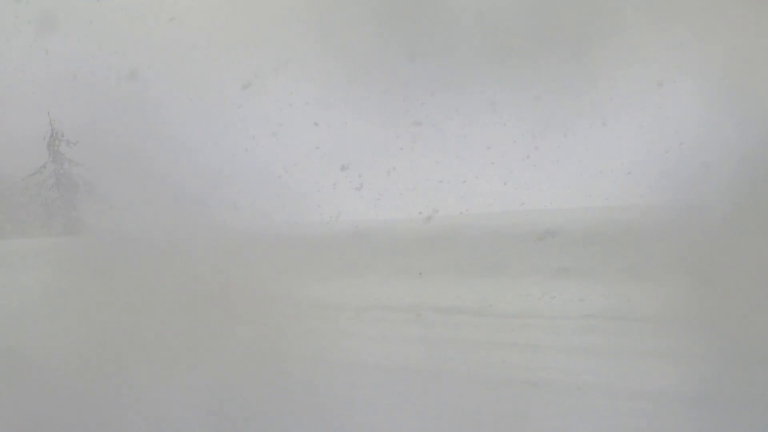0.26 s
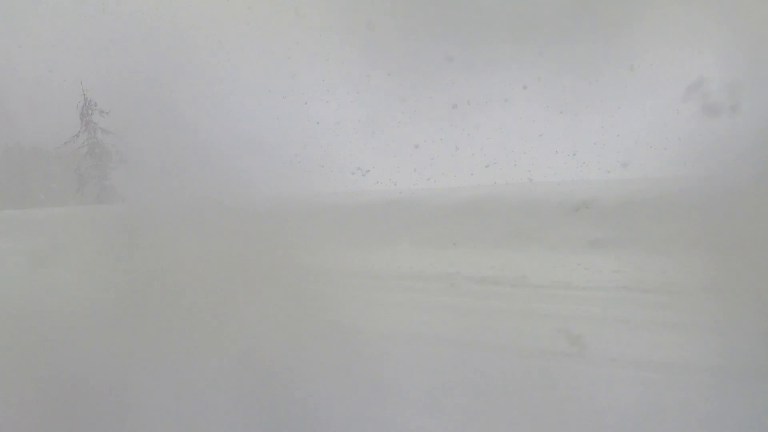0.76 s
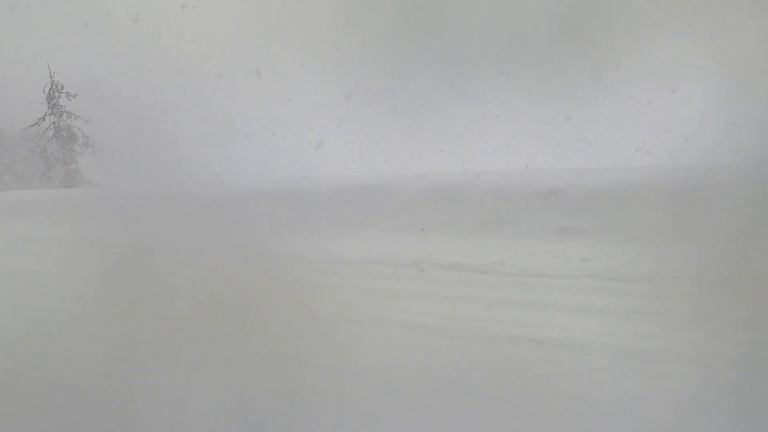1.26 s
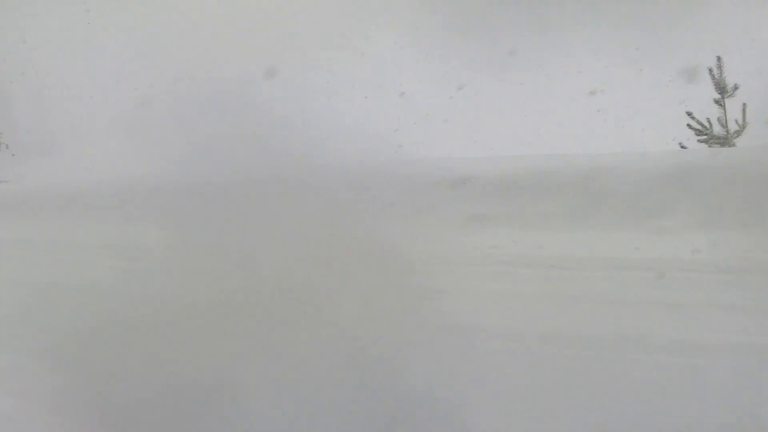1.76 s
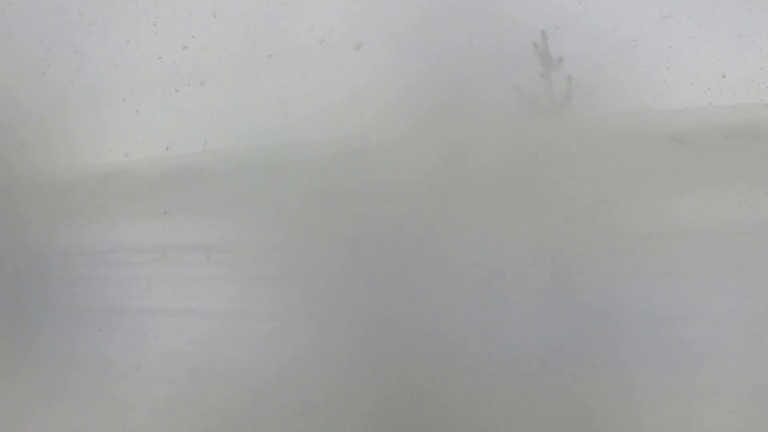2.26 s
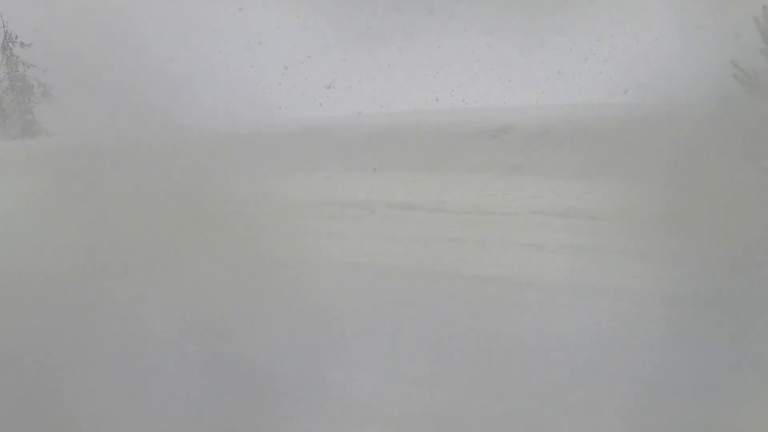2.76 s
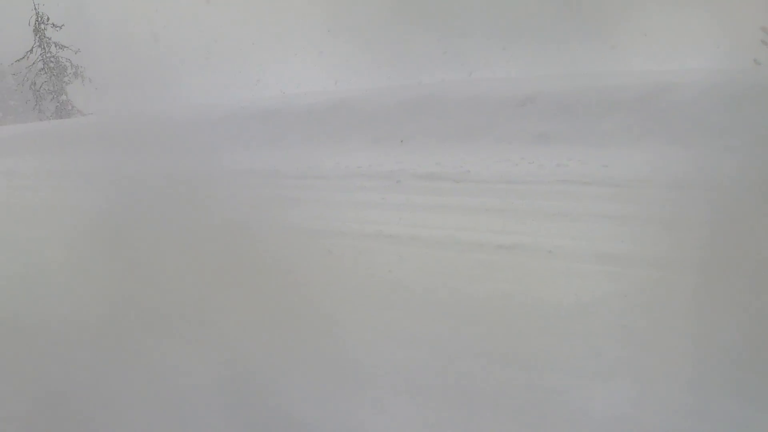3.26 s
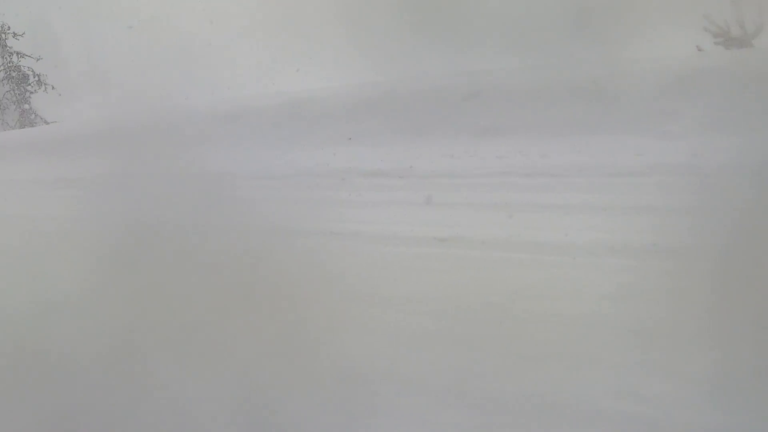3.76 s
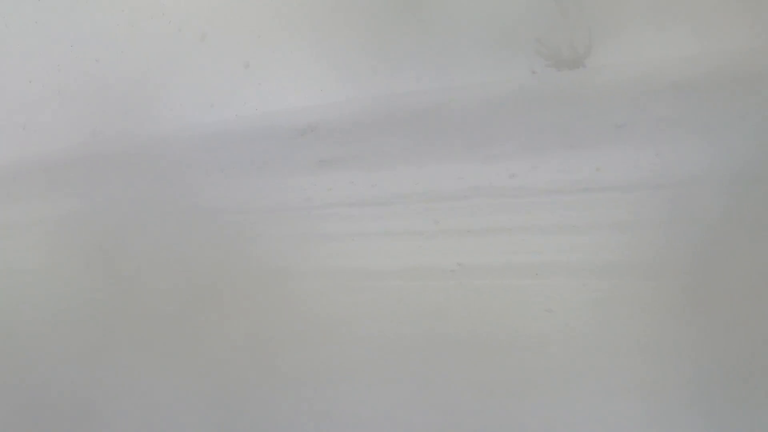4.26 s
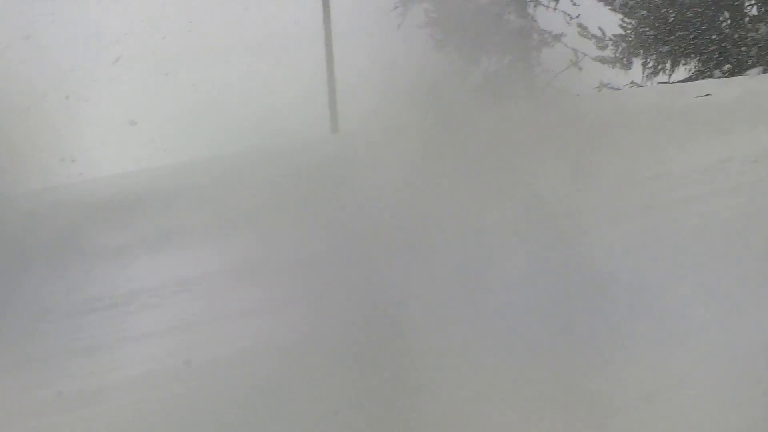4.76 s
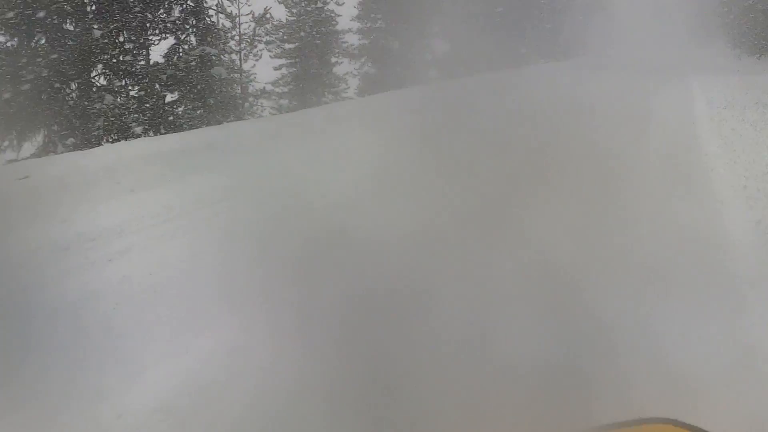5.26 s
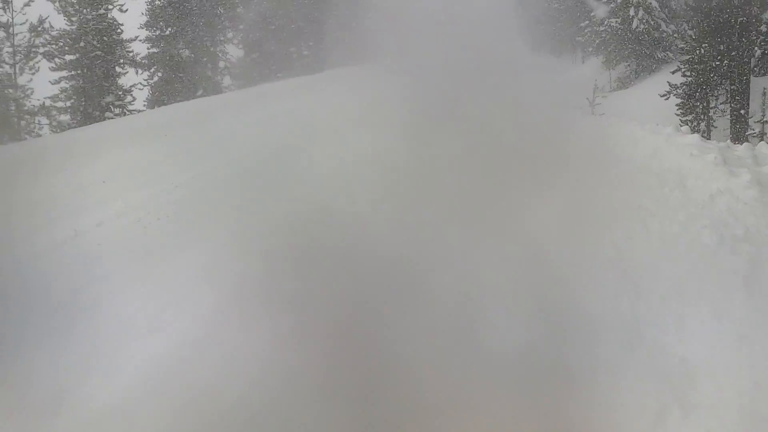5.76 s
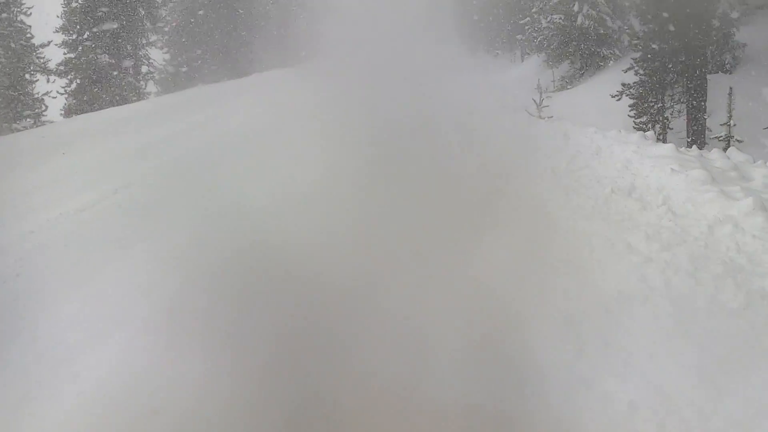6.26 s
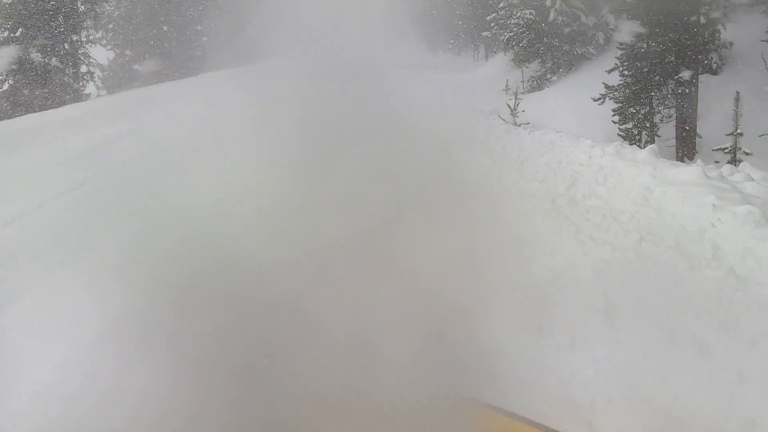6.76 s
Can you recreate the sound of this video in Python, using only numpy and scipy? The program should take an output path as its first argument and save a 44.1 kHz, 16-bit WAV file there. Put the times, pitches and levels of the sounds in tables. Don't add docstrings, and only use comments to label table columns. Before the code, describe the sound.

A lumpy low engine idle thumps close by while a distant sled hums and whistles. At about two seconds the near engine revs, stumbles with bright crackles, then gains speed in steps, belt whining and track rushing through snow. The far drone is covered. A heavy wind buffet strikes at the end; treble leans left because snow covers the right microphone.

```python
import sys
import numpy as np
from scipy import signal
from scipy.fft import rfft, irfft
from scipy.io import wavfile
from scipy.ndimage import uniform_filter1d, map_coordinates

SR = 44100
rng = np.random.default_rng(int(sys.argv[2]) if len(sys.argv) > 2 else 0)


def voltage_ratio(level):
    return 10 ** (np.asarray(level, float) / 20)


def wav_out(sig):
    wavfile.write(sys.argv[1], SR, np.round(np.clip(np.atleast_2d(sig).T, -1, 1) * 32767).astype(np.int16))


N = 308700


def evened(x):
    return x / np.sqrt(np.mean(x ** 2) + 1e-20)


def read(points, hz):
    point_hz, value = np.transpose(points)
    return np.interp(np.log(hz + 1), np.log(point_hz + 1), value)


def play(rows, t):
    start_s, *columns = np.transpose(rows)
    return [np.interp(t, start_s, column) for column in columns]


def drift(hz):
    knots = rng.standard_normal(2000)
    return evened(map_coordinates(knots, [np.arange(N) * hz / SR], order=3))


def level(rest_db, gain_db, control):
    return rest_db + gain_db * control


# pitch_hz, width_hz, lift_db
HOOD = [(294.6, 22, 13), (454, 15, 3.5), (700, 76, -4.5), (960, 11, 6.5), (1136, 50, 6), (1443, 13, 7.5),
        (1522, 25, 4), (1603, 17, 10), (3140, 210, 7.5)]


def hood_db(hz):
    return sum(lift_db / (1 + ((hz - f) / width_hz) ** 2) for f, width_hz, lift_db in HOOD)


def noise(spectrum, level_db, lift=0.0, patchy_db=1.5):
    frames, hz = N // 256 + 5, np.fft.rfftfreq(1024, 1 / SR)[:, None]
    a, b, c, d, patches = rng.standard_normal((frames, 513, 5), dtype=np.float32).T
    patches = evened(uniform_filter1d(uniform_filter1d(patches, 10, 0), 16, 1))
    colour_db = read(spectrum, hz) + lift * hood_db(hz) + patchy_db * patches
    z = np.array([a + 1j * b, c + 1j * d]) * voltage_ratio(colour_db)
    x = signal.istft(z, nperseg=1024, noverlap=768)[1][:, :N]
    return voltage_ratio(level_db) * evened(x)


# pitch_hz, likeness_0_1
PORT_LIKENESS = [(60, .7), (120, .99), (250, .85), (500, .9), (1010, .75), (2030, .8), (4120, .55),
                 (8330, .5)]
# pitch_hz, left_over_right_db
PORT_SHADOW = [(60, 2.7), (100, 2), (180, 1.8), (310, 4.5), (540, 10), (930, 15.5), (1610, 17), (2780, 14),
               (4810, 17.5), (8330, 32)]
# pitch_hz, left_lead_rad
PORT_LEAD = [(0, 0), (800, -.3), (1640, -.8), (2240, -1.3), (3360, -1.2), (3880, -.9), (5000, 1.2),
             (7150, 1.3)]


def ports(shared, own, shadow, lag_s):
    pad = 3150
    shared, own = np.pad(shared, pad, "reflect"), np.pad(own, ((0, 0), (pad, pad)), "reflect")
    hz = np.fft.rfftfreq(len(shared), 1 / SR)
    same = np.clip(read(PORT_LIKENESS, hz), -1, 1)
    tilt_db = shadow * read(PORT_SHADOW, hz)
    lead_rad = read(PORT_LEAD, hz)
    right = rfft(shared) + same * np.exp(-1j * lead_rad) * rfft(own[0])
    right = right + np.sqrt(1 - same ** 2) * rfft(own[1])
    left = rfft(shared + own[0]) * np.exp(-2j * np.pi * hz * lag_s)
    left_gain = 2 / np.sqrt(1 + voltage_ratio(-2 * tilt_db) + 2 * same * np.cos(lead_rad) * voltage_ratio(-tilt_db))
    return irfft(left_gain * np.array([left, right * voltage_ratio(-tilt_db)]), len(shared))[:, pad:-pad]


# pitch_hz, level_db_per_hz
WIND = [(12, -0.5), (30, -2), (60, -8), (120, -3.5), (300, -31), (1000, -69), (3000, -130)]


def wind(t, speed):
    gust_s, gust_rise_s, gust_db = 6.29, 0.14, 14.5
    gust = gust_db / (1 + np.exp((gust_s - t) / gust_rise_s))
    return noise(WIND, level(-34.5, -2.5, speed) + gust, patchy_db=2.5)


# pitch_hz, level_db_per_hz
AIR = [(7000, -30), (9000, -1.5), (12000, -4), (15500, -11)]


def air(churn_db):
    return noise(AIR, 0.36 * churn_db - 63.5, patchy_db=-3.5) * voltage_ratio([[3.5], [-3.5]])


# start_s, level_db
FAR = [(0, -51.5), (.7, -51.5), (1, -48.5), (2, -48.5), (3, -49), (4.5, -49.5), (7, -58)]
# multiples of its firing rate, then level_db of each
FAR_MULTIPLES = [1, 2, 4, 5, 7, 8, 8.5, 9, 10, 12, 17.3, 18, 30]
FAR_MULTIPLE_DB = [19, 3.5, 1, -5, -18, -0.5, -5, -6.5, -4, -13, -11, -10, -22.5]


def far_engine(t):
    rate_hz, sag_hz_per_s, settle_hz, settle_s = 131.8, 1.12, 5.2, .55
    turns = np.cumsum(rate_hz - sag_hz_per_s * t + settle_hz * np.exp(-t / settle_s)) / SR
    out = np.zeros(N)
    for multiple, db in zip(FAR_MULTIPLES, FAR_MULTIPLE_DB):
        waver = voltage_ratio(db + 3 + 1.8 * drift(9))
        out += waver * np.cos(2 * np.pi * multiple * turns + .45 * drift(7))
    return voltage_ratio(play(FAR, t)[0]) * out


def far_fan(t, speed):
    fan_hz, sag_hz_per_s = 1539, 6
    turns = np.cumsum(fan_hz - sag_hz_per_s * t) / SR
    level_db = play(FAR, t)[0] + level(2, -4, speed) + 1.8 * drift(9)
    return voltage_ratio(level_db) * np.cos(2 * np.pi * turns + .7 * drift(12))


# pitch_hz, level_db_per_hz
ROAR = [(120, -23), (200, 3), (227, -12.5), (316, -9), (434, -8), (525, -16), (858, -25), (1040, -19),
        (1420, -14.5), (1540, -18.5), (1800, -19.5), (2320, -17), (3620, -36.5), (7380, -35.5),
        (8780, -49.5), (11400, -80), (19300, -120)]


def far_sled(t, speed):
    roar = noise(ROAR, play(FAR, t)[0] + level(10, -1.5, speed), lift=0.64)
    return ports(far_engine(t) + far_fan(t, speed), roar, 1.1, 0.0001)


# start_s, firings, first_burnt_share_0_1
MISSES = [(1.858, 2, .3), (1.958, 1, .5), (2.907, 2, .4), (2.978, 2, .35), (3.025, 2, .15), (3.071, 1, .4),
          (3.118, 1, 0), (3.164, 1, .1), (3.232, 1, .3), (3.277, 1, 0), (3.321, 2, 0), (3.388, 1, .6),
          (3.432, 1, 0), (4.54, 2, 0), (4.883, 1, .6), (4.923, 1, .5), (4.974, 2, 0), (5.004, 2, 0),
          (5.064, 1, .4), (5.084, 2, 0), (5.203, 1, .5)]
# pitch_hz, level_db_per_hz
POP = [(1500, -20.5), (3000, 2), (5500, 2), (7600, -7.5), (8800, -31)]


def pops(throttle):
    t60_s = .07
    hits, t = np.zeros(N), np.arange(4000) / SR
    for start_s, count, share in MISSES:
        hits[round((start_s + .011 * count - .008) * SR)] = (count - 1 + .3) * (1 - share)
    return signal.oaconvolve(hits, voltage_ratio(-60 * t / t60_s))[:N] * noise(POP, level(-67, 24, throttle))


# pitch_hz, level_db_per_hz
CHURN = [(210, -30), (350, 0.5), (390, -1), (465, 1), (524, -13), (678, 1), (852, -13), (975, 2),
         (1040, -3), (2070, -14.5), (3960, -20), (7570, -36), (8780, -45.5), (11400, -83.5), (19300, -120)]


def track(throb, burn, churn_db, throttle):
    spit = 1 + 0.17 * np.maximum(.85 - burn, 0)
    churn = throb * spit * noise(CHURN, churn_db, lift=0.63)
    return ports(np.zeros(N), churn + pops(throttle), 0.99, 1e-5)


# start_s, firings_hz
REVS = [(0, 62), (.5, 55.2), (.9, 54), (1.25, 50.8), (1.55, 51.6), (2, 61.6), (2.45, 92), (3, 84.8),
        (3.4, 91), (3.65, 90.8), (4.6, 98.8), (5.05, 99.2), (5.25, 103.3), (5.5, 118.2), (5.8, 115.2),
        (6.15, 125), (6.5, 132.8), (7, 148)]


def crank(t):
    return np.cumsum(play(REVS, t)[0]) / SR + .35


def thump(hz):
    ring_hz, ring_t60_s = 128.0, .09
    t = np.arange(-800, 2400) / SR
    u, late_s = (np.pi * hz * t) ** 2, np.maximum(t - .006, 0)
    ring = np.sin(2 * np.pi * ring_hz * late_s) * voltage_ratio(-60 * late_s / ring_t60_s)
    return (2 * u - 1) * np.exp(-u) + .2 * ring


# start_s, firings
LATE = [(.002, 1), (.067, 2), (.134, 1), (.184, 2), (.269, 1), (.303, 1), (.338, 2), (.408, 2), (.514, 2),
        (.569, 2), (.64, 4), (.749, 2), (.823, 3), (.916, 1), (.972, 2), (1.049, 2), (1.145, 2), (1.242, 2),
        (1.32, 2), (1.436, 2), (1.533, 1), (1.649, 1), (1.704, 1), (1.862, 2), (1.963, 1)]


def exhaust(turns):
    at = np.flatnonzero(np.diff(np.floor(turns)))
    count_all = len(at)
    size = 1 + .07 * (-1.) ** np.arange(count_all) + .09 * rng.standard_normal(count_all)
    train, slump, chance = np.zeros(N), np.zeros(N), rng.standard_normal((count_all, 2))
    for start_s, count, share in MISSES:
        k = np.argmin(abs(at - start_s * SR))
        size[k:k + count] = (share, .42 - share)[:count]
        slump[at[k]] = 0.32 * (1 - share) ** 2
        size[k + count] *= 1.2
    for start_s, count in LATE:
        k = np.argmin(abs(at - (start_s - .0075) * SR)) + np.arange(count)
        share = np.where(k == k[0], 0.44, 0.58) + .15 * chance[k, 0]
        size[k] *= np.maximum(1 - 0.62 * share, 0)
        delay = (.43 + .04 * chance[k, 1]) * (at[k + 1] - at[k])
        train[at[k] + np.round(delay).astype(int)] = 1.86 * share
    train[at] = size
    hot = np.clip((np.gradient(turns) * SR - 108.0) / 48.0, 0, 1)
    low = signal.oaconvolve(train * (1 - hot), thump(80.0)) + signal.oaconvolve(train * hot, thump(129.7))
    slump_s = 0.0049
    u = np.arange(-800, 2400) / SR / slump_s - .4
    low = (low - signal.oaconvolve(slump, u * np.exp(-u ** 2)))[800:N + 800]
    power = uniform_filter1d(uniform_filter1d(low ** 2, 9000), 9000)
    return low / np.sqrt(abs(power)), train


# firings_hz, level_db
THUMP = [(52, -16.5), (62, -16.5), (80, -15), (95, -14), (128, -13.5), (138, -15.5), (148, -17.5)]
# pitch_hz, level_db
PIPE = [(110, -31.5), (170, -7.5), (205, -24), (280, 0.5), (345, -7), (420, -23.5), (465, 6), (520, -9)]
# pitch_hz, level_db
BELT = [(520, -69.5), (700, -41.5), (830, -55.5), (960, -35.5), (1120, -37.5), (1280, -36.5), (1400, -48)]
# multiples of the firing rate, then level_db of each
BUZZ_ORDERS = [2.5, 3.5, 5, 5.5, 6, 7, 7.5, 8, 8.5, 10.5, 11, 12]
BUZZ_ORDER_DB = [-4.5, 4, 4.5, -2, 4.5, 4.5, -1, -5, 3.5, 1.5, -5.5, 0.5]


def engine(turns, throttle):
    hz = np.gradient(turns) * SR
    low, train = exhaust(turns)
    burn = np.minimum(uniform_filter1d(train, 600) * SR / hz, 1.2)
    burn = uniform_filter1d(uniform_filter1d(burn, 300), 300)
    shaft_db, buzz_db = level(-51, 27, throttle), level(-61, 17, throttle)
    belt_order = 9.55
    # order, level_db, waver
    tones = [(k, db + read(PIPE, k * hz), .25) for k, db in ((2, -23.5), (3, -31.5), (4, -37.5))]
    tones += [(.5, shaft_db, .5), (1.5, shaft_db - 3.0, .5)]
    tones += [(belt_order, read(BELT, belt_order * hz), .3)]
    tones += [(k, buzz_db + db + hood_db(k * hz), .35) for k, db in zip(BUZZ_ORDERS, BUZZ_ORDER_DB)]
    out = np.zeros(N)
    for order, db, waver in tones:
        phase = 2 * np.pi * order * turns + 1.6 * waver * drift(8)
        out -= voltage_ratio(db + 3 + 6 * waver * drift(14)) * np.cos(phase)
    return voltage_ratio(read(THUMP, hz)) * low + burn * out, burn


# pitch_hz, level_db_per_hz
GROWL = [(40, -13), (90, -8), (200, 2.5), (300, -8.5), (500, -11), (700, -4), (1000, -13), (1500, -16),
         (2500, -23), (6000, -50.5), (11000, -110)]


def near_engine(motor, throb, throttle):
    growl = throb * noise(GROWL, level(-50.5, 30, throttle), lift=0.22)
    return ports(motor, growl, 0.44, 8e-5)


# start_s, throttle_0_1, track_speed_0_1
LOAD = [(0, 0.3, .2), (.6, 0.12, 0.3), (1.4, .02, .05), (1.9, 0.2, 0.4), (2.15, 0.4, 0.46),
        (2.35, 0.52, .55), (2.8, 0.46, 0.34), (3.3, 0.46, .25), (3.8, 0.44, 0.51), (4.3, 0.6, 0.53),
        (4.6, 0.61, 0.53), (4.8, 0.68, 0.71), (5.2, 0.74, 0.82), (5.45, 0.67, 0.91), (6.1, 0.77, 0.92),
        (6.45, 0.74, 1), (7, 0.92, 1)]


def scene():
    t = np.arange(N) / SR
    turns = crank(t)
    throttle, speed = play(LOAD, t)
    churn_db = level(-60, 32.5, speed)
    motor, burn = engine(turns, throttle)
    throb = 1 + 0.046 * np.cos(2 * np.pi * turns)
    background = wind(t, speed) + air(churn_db) + far_sled(t, speed)
    return background + track(throb, burn, churn_db, throttle) + near_engine(motor, throb, throttle)


def top_cut(x):
    return signal.sosfilt(signal.butter(12, 15650, fs=SR, output="sos"), x)


def record(dry):
    ceiling, offset = 0.85, .0023
    blocked = signal.sosfilt(signal.butter(1, 8, "high", fs=SR, output="sos"), dry)
    return top_cut(ceiling * np.tanh(blocked / ceiling) + offset)


dry = scene()
out = record(dry)
wav_out(out)
```